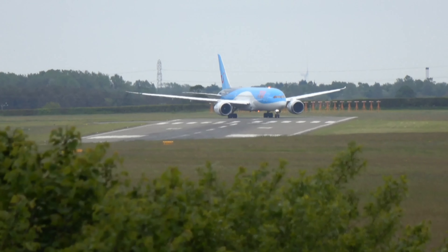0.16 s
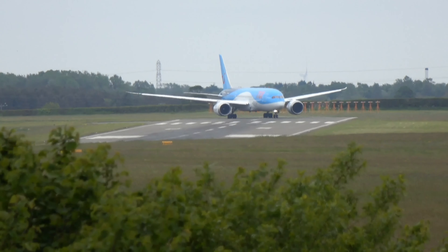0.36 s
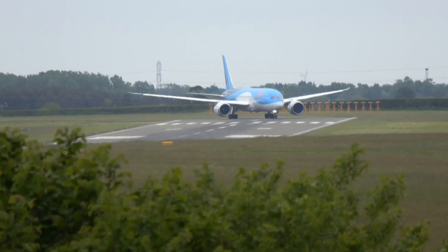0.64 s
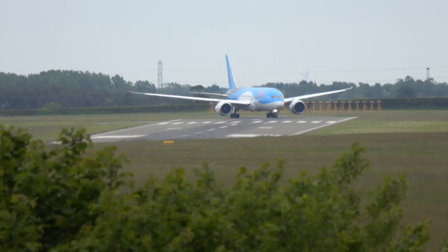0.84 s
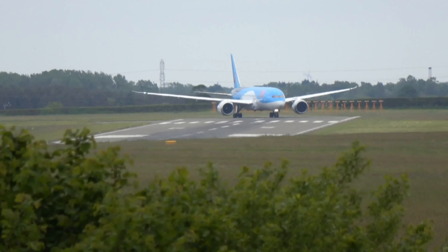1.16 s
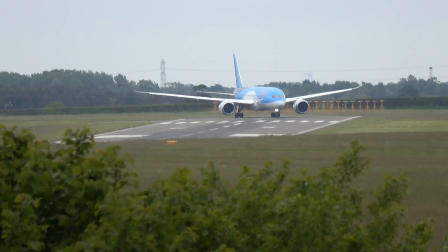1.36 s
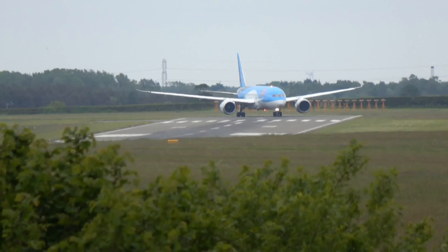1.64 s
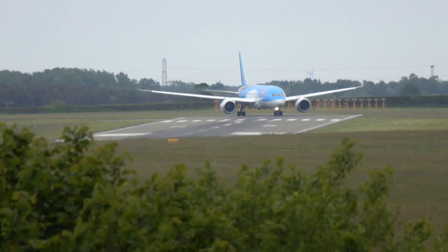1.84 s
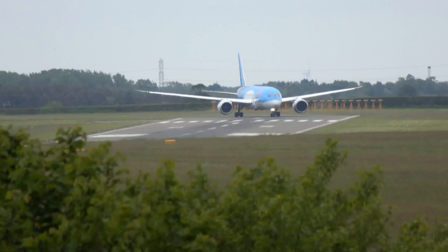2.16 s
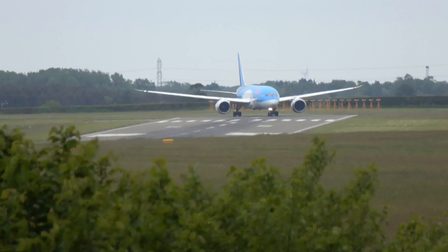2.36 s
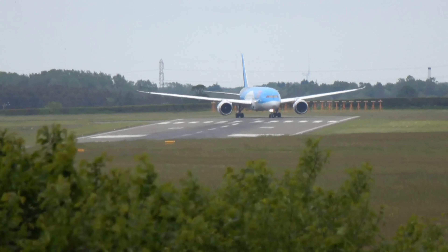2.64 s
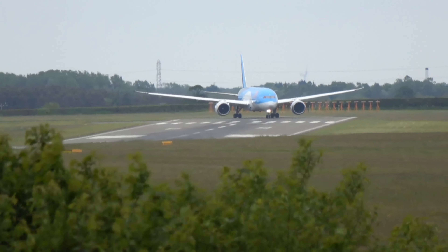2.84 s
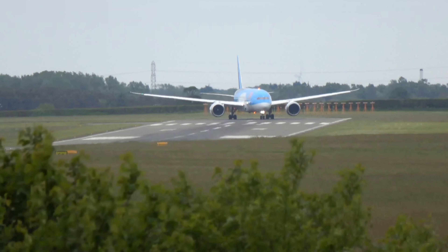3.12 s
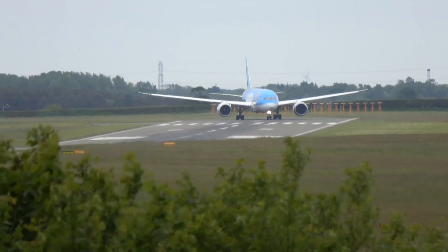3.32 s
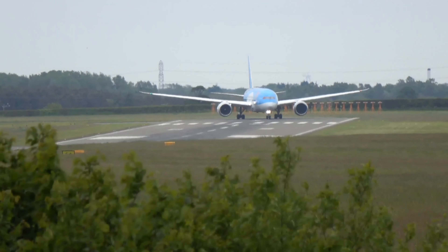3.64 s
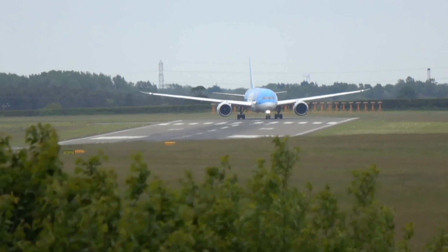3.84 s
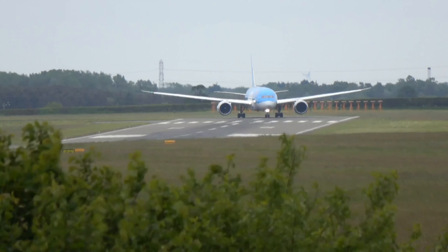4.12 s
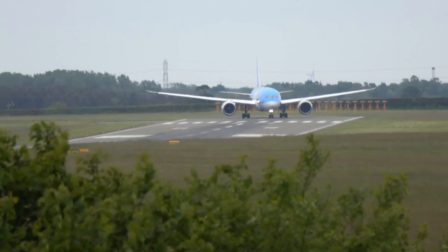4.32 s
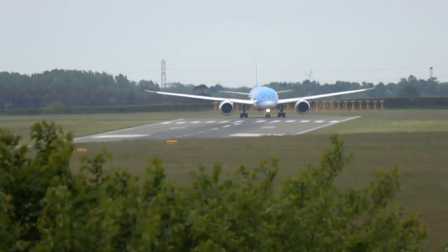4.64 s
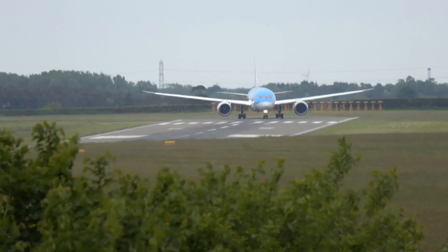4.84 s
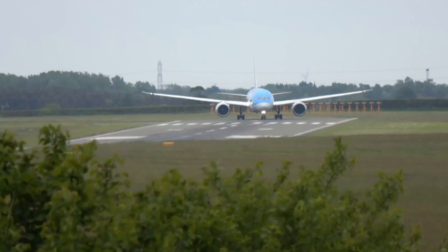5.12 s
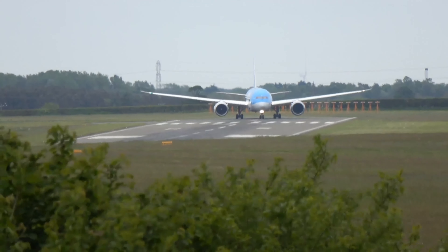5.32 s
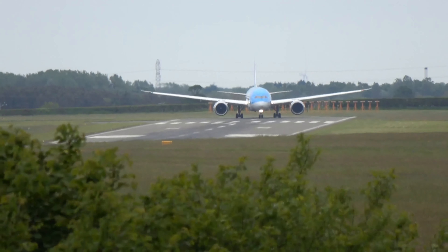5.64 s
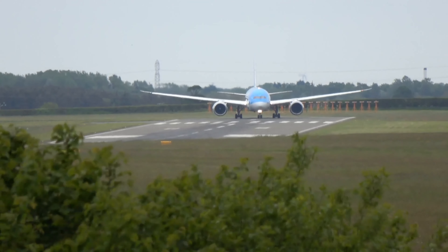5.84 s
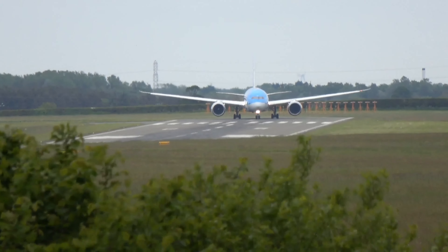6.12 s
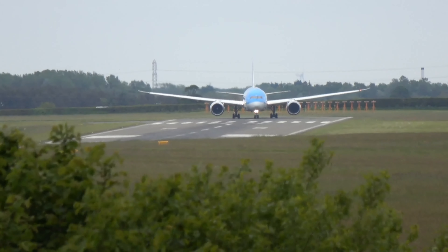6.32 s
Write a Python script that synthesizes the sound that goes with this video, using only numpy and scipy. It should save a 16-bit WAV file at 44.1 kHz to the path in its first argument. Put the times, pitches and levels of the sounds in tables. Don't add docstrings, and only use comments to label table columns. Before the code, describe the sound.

Outdoors across a grass field, a distant twin-jet airliner gives a continuous broad, soft roar at low thrust, with a breathy fan moan slowly falling in pitch. Strong gusts thud and flutter on an unprotected microphone, briefly overloading it. A near bird chirps clear gliding notes early; a farther one warbles and trills. Late on, a low propeller-engine drone joins.

```python
import sys
import numpy as np
from scipy import signal
from scipy.fft import rfft, irfft
from scipy.io import wavfile
from scipy.ndimage import uniform_filter1d

SR = 44100
rng = np.random.default_rng(int(sys.argv[2]) if len(sys.argv) > 2 else 0)


def boost_factor(decibels):
    exponent = np.asarray(decibels, float) / 20
    return 10 ** exponent


def unload_audio(sound):
    columns = np.transpose(np.atleast_2d(sound))
    steps = np.round(np.clip(columns, -1, 1) * 32767)
    wavfile.write(sys.argv[1], SR, steps.astype(np.int16))


N = 285768

# [start
# t/s, end t/s, first f/Hz, last f/Hz, level/dB]
FAR_WHISTLES = [(2.74, 2.89, 7700, 7720, -73), (2.8, 2.96, 6850, 6850, -72),
                (3.06, 3.145, 4300, 4230, -54.5), (3.29, 3.36, 5680, 5620, -63),
                (3.43, 3.67, 3850, 3820, -52.5), (3.89, 4.08, 5550, 5450, -62.5),
                (4.64, 4.69, 7200, 7180, -69), (4.925, 4.955, 7300, 7250, -68),
                (4.965, 5.1, 6030, 5850, -61), (5.65, 5.79, 6800, 6780, -69), (5.85, 6.02, 6130, 6100, -68),
                (6.05, 6.19, 6050, 6050, -66), (5.87, 5.92, 4900, 4700, -63), (6.07, 6.11, 4700, 4600, -62)]
# [start t/s, end t/s, first f/Hz, last f/Hz, level/dB]
FAR_WARBLES = [(.22, .36, 8500, 8550, -77), (.2, .36, 6850, 6950, -76), (2.435, 2.5, 5000, 4800, -60),
               (2.5, 2.57, 5050, 4850, -60), (2.575, 2.645, 5120, 4950, -59.5),
               (2.645, 2.72, 5100, 5000, -60), (3.025, 3.07, 4500, 4350, -56),
               (3.185, 3.29, 5900, 5750, -59.5), (3.32, 3.445, 5250, 5050, -58.5),
               (3.67, 3.85, 7150, 7250, -68), (4.725, 4.79, 3950, 4080, -49.5),
               (4.825, 4.89, 3950, 4060, -50.5), (4.88, 4.93, 4000, 3950, -56),
               (5.77, 5.9, 6600, 6750, -72), (6.18, 6.24, 5950, 5900, -64), (6.2, 6.24, 8650, 8650, -77),
               (6.25, 6.295, 4950, 4900, -61)]
# [start t/s, end t/s, first f/Hz, last f/Hz, level/dB]
FAR_BUZZES = [(2.73, 2.89, 7300, 7250, -70), (4.65, 4.72, 6900, 6400, -65), (4.94, 5.01, 6900, 6300, -66),
              (5.08, 5.13, 5300, 5200, -58), (5.11, 5.21, 5300, 5300, -63), (5.19, 5.28, 5450, 4950, -58),
              (5.3, 5.4, 5300, 5100, -57), (5.39, 5.51, 5300, 5200, -57.5), (5.47, 5.65, 5350, 5300, -58)]
# [start t/s, top t/s, end t/s, top f/Hz, level/dB]
NEAR_ARCHES = [
    (.385, .447, .492, 3800, -43),
    (.538, .578, .635, 3740, -44),
    (.705, .736, .77, 3770, -48),
    (1.37, 1.405, 1.407, 4000, -52),
]
# [start t/s, end t/s, first f/Hz, last f/Hz, level/dB]
NEAR_SLIDES = [(.2, .33, 4600, 3160, -45), (1.035, 1.16, 3550, 4540, -53), (1.15, 1.23, 4540, 3650, -57),
               (2.215, 2.325, 4250, 3350, -54), (2.425, 2.47, 3400, 3650, -51),
               (2.46, 2.505, 3650, 3200, -49), (2.6, 2.64, 3450, 3900, -54), (2.64, 2.69, 3800, 3300, -52),
               (2.735, 2.755, 3800, 3300, -51), (4.97, 5.005, 4850, 4700, -58), (5, 5.11, 4420, 4000, -58),
               (5.275, 5.322, 5100, 6900, -68), (5.318, 5.35, 7000, 6100, -74),
               (5.6, 5.635, 5100, 5700, -62), (5.795, 5.84, 5200, 6050, -62),
               (5.995, 6.03, 5100, 5400, -59), (6.388, 6.412, 3500, 4300, -46),
               (6.412, 6.465, 5420, 5050, -55)]
# [leap t/s, lead-in t/s, low f/Hz, level/dB]
NEAR_LEAPS = [
    (.078, .048, 3470, -43),
]
# [t/s, third order f/Hz, level/dB]
DRONE_TRACK = [(4.4, 150.2, -46), (4.7, 150.2, -38), (5, 150.2, -35), (5.6, 150.1, -34), (6.2, 150, -35),
               (6.45, 149.8, -42)]
# [multiple of the first order, level/dB]
DRONE_ORDERS = [(1, -2), (2, 1), (3, 0)]
# [f/Hz, level/dB per Hz]
BUFFET_SPECTRUM = [(1, -60), (3, -24), (9, -8), (22, 0), (30, -2), (42, -11), (55, -35), (120, -120)]
# [f/Hz, level/dB per Hz]
FLUTTER_SPECTRUM = [(15, -89), (30, -23), (46, 7.5), (70, -1), (110, -19), (200, -24), (400, -73),
                    (800, -140)]
# [middle t/s, length t/s, buffet level/dB, flutter level/dB]
GUST_EVENTS = [(0.03, 0.073, -9, -28.5), (0.154, 0.28, -6, -16.5), (.33, 0.3, -15, -21.5),
               (0.539, 0.25, -11.5, -16.5), (0.673, 0.15, -12.5, -23), (0.809, 0.12, -9.5, -23),
               (0.982, 0.29, -8, -18.5), (1.201, .16, -9.5, -25), (1.317, 0.11, -19, -37),
               (1.51, 0.22, -26, -35), (1.832, 0.44, -22, -39), (2.29, 0.17, -13, -35),
               (2.48, 0.25, -16, -32), (2.756, .14, -9.5, -25), (2.891, 0.21, -5, -25),
               (3.127, .18, -5.5, -24.5), (3.33, 0.18, -6, -22), (3.62, 0.6, -23, -34),
               (3.99, .14, -20.5, -38), (4.453, 0.13, -22, -26), (4.706, 0.3, -12.5, -34),
               (4.902, .14, -22, -36), (5.247, 0.17, -17, -28.5), (5.406, 0.16, -20, -32),
               (5.606, 0.26, -11, -26), (5.76, 0.32, -10, -18), (5.923, 0.12, -13.5, -18.5),
               (6.07, 0.4, -12, -23), (6.256, 0.093, -15.5, -32), (6.434, 0.2, -9, -20.5)]
CALM_LEVELS = -27, -33
# [t/s, f/Hz, level/dB]
FAN_TRACK = [(0, 265, -49.5), (.5, 265, -31.5), (1.4, 249.8, -35), (2.2, 235.5, -38), (3, 220.6, -35),
             (4, 208, -34.5), (4.6, 209, -44), (5.5, 209, -40), (6.48, 205.5, -58)]
# [f/Hz, level/dB per Hz]
JET_SPECTRUM = [(40, -19.5), (70, -2), (170, 0), (240, 3.5), (320, -2), (500, -16.5), (920, 0),
                (2000, -15.5), (3500, -27.5), (4300, -36), (6000, -46), (7500, -53.5), (11000, -56.5),
                (11600, -86)]
JET_BAND_CENTRES = 330, 950, 2200, 9000
# [t/s, gain level/dB]
AIR_CARRY = [(0, -1.5), (.4, -2.5), (.8, 1), (1.2, -1.5), (1.6, -2), (2.2, -1), (2.8, 0.5), (3.3, -2),
             (3.8, -1), (4.4, -1.5), (4.9, -2.5), (5.3, -0.5), (5.7, 0.5), (6.1, -1), (6.48, -1.5)]
CARRY_SHARES = .6, 1.05, .7
NOSE_ON_TIMES = 4.4, 4.58
NOSE_ON_GAINS = 3.5, 0.95, 2.5


def evened(x):
    return x / np.sqrt(np.mean(x ** 2) + 1e-20)


def read(points, hz):
    f, value = np.transpose(points)
    return np.interp(np.log(hz + 1), np.log(f + 1), value)


def columns(rows):
    s, *rest = np.transpose(rows)
    t = np.arange(s[0], s[-1], 1 / SR)
    return s[0], [np.interp(t, s, c) for c in rest]


def add(mix, s, sound):
    part = mix[round(s * SR):][:len(sound)]
    part += sound[:len(part)]


def wander(size, span_s):
    width = max(int(span_s * SR), 1)
    smooth = uniform_filter1d(rng.standard_normal(size), width)
    return evened(uniform_filter1d(smooth, width))


def coloured(points):
    hz = np.fft.rfftfreq(N, 1 / SR)
    return evened(irfft(rfft(rng.standard_normal(N)) * boost_factor(read(points, hz)), N))


def hedges(x, t60=0.45):
    t = np.arange(SR // 2) / SR
    echoes = rng.standard_normal(len(t))
    sparse = rng.random(len(t)) < .05
    taps = echoes * sparse * boost_factor(-60 * t / t60)
    return signal.fftconvolve(x, taps / np.linalg.norm(taps))[:N]


def trill(start, end, first_hz, last_hz, depth_hz, db):
    s, (hz,) = columns([(start, first_hz), (end, last_hz)])
    rate_hz = 120 * (1 + .4 * wander(len(hz), .003))
    warble = np.sin(2 * np.pi * np.cumsum(rate_hz) / SR)
    weakening_db = np.linspace(0, -4, len(hz))
    level_db = 3 * wander(len(hz), .006) + weakening_db
    tone = boost_factor(level_db) * np.sin(2 * np.pi * np.cumsum(hz + depth_hz * warble) / SR)
    return s, boost_factor(db) * evened(tone) * signal.windows.tukey(len(hz), .3)


def far_bird():
    song = np.zeros(N)
    for depth_hz, rows in ((65, FAR_WHISTLES), (165, FAR_WARBLES), (520, FAR_BUZZES)):
        for start, end, first_hz, last_hz, db in rows:
            add(song, *trill(start, end, first_hz, last_hz, depth_hz, db))
    return song


def glide(rows):
    s, (hz, db) = columns(rows)
    smooth_hz = uniform_filter1d(hz, size=300, mode="nearest")
    tone = np.sin(2 * np.pi * np.cumsum(smooth_hz) / SR)
    level = boost_factor(db + 2 * wander(len(hz), .006))
    return s, np.sqrt(2) * level * tone * signal.windows.tukey(len(hz), .15)


def arch(start, top, end, top_hz, db):
    hz_per_s, ends_db = 13500, -6
    return glide([(start, top_hz - hz_per_s * (top - start), db + ends_db),
                  (top, top_hz, db),
                  (end, top_hz - hz_per_s * (end - top), db + ends_db)])


def slide(start, end, first_hz, last_hz, db):
    bow, ends_db, db_per_khz = 1.6, -5, -4
    u = np.linspace(0, 1, 9)
    below = (u if first_hz > last_hz else 1 - u) ** bow
    hz = max(first_hz, last_hz) - abs(first_hz - last_hz) * below
    level = db + ends_db * (2 * u - 1) ** 2 + db_per_khz * (hz - hz.mean()) / 1000
    return glide(np.transpose([start + (end - start) * u, hz, level]))


def leap(at, lead, low_hz, db):
    leap_s, hold_s, lead_db = .012, .05, -4
    high_hz, high_db = low_hz * 1.365, db - 10
    return glide([(at - lead, .97 * low_hz, db + lead_db),
                  (at, low_hz, db),
                  (at + leap_s, .985 * high_hz, high_db),
                  (at + leap_s + .6 * hold_s, high_hz, high_db),
                  (at + leap_s + hold_s, .965 * high_hz, high_db + lead_db)])


def near_bird():
    song = np.zeros(N)
    for note, rows in ((arch, NEAR_ARCHES), (slide, NEAR_SLIDES), (leap, NEAR_LEAPS)):
        for row in rows:
            add(song, *note(*row))
    return song


def drone(waver_db=1.5):
    s, (hz, db) = columns(DRONE_TRACK)
    turns = np.cumsum(hz / 3) / SR
    tones = np.zeros(len(hz))
    for k, order_db in DRONE_ORDERS:
        level = boost_factor(order_db + waver_db * wander(len(hz), 0.13))
        tones += level * np.sin(2 * np.pi * (k * turns + rng.random()))
    return s, np.sqrt(2) * boost_factor(db) * tones * signal.windows.tukey(len(hz), .2)


def gusts(size):
    t = np.arange(size) / SR
    power = boost_factor(np.array(CALM_LEVELS))[:, None] ** 2 * np.ones(size)
    for middle, length, *levels_db in GUST_EVENTS:
        swell = np.cos(np.pi * np.clip((t - middle) / length, -.5, .5)) ** 2
        power = power + boost_factor(np.array(levels_db))[:, None] ** 2 * swell
    return 10 * np.log10(power)


def wind():
    db, flutter_db = gusts(N)
    slow_spectrum = [(hz / 1.4, level) for hz, level in BUFFET_SPECTRUM]
    layers = [coloured(BUFFET_SPECTRUM), coloured(FLUTTER_SPECTRUM), coloured(slow_spectrum)]
    quick, flutter, slow = (v / np.sqrt(uniform_filter1d(v ** 2, size=2000) + 0.1) for v in layers)
    share = np.interp(uniform_filter1d(flutter_db, size=4000), (-28, -23), (0, np.pi / 2))
    buffet = np.sin(share) * quick + np.cos(share) * slow
    buffet = buffet - uniform_filter1d(buffet, size=12000)
    t = np.arange(N) / SR
    edge_db = -15 * np.exp(-t / .006) - 7 * np.exp((t - t[-1]) / .006)
    return 0, boost_factor(edge_db) * (boost_factor(db) * buffet + boost_factor(flutter_db) * flutter)


def moan(width_hz=14):
    s, (hz, db) = columns(FAN_TRACK)
    turn = np.exp(2j * np.pi * np.cumsum(hz) / SR)
    r = np.exp(-np.pi * width_hz / SR)
    noise = rng.standard_normal(len(hz)) / turn
    slow = signal.lfilter([(1 - r) ** 2], [1, -2 * r, r * r], noise)
    return s, boost_factor(db) * evened((slow * turn).real)


def jets(patchy_db=0.44, swell_db=0.63):
    frames, hz = N // 256 + 5, np.fft.rfftfreq(1024, 1 / SR)
    starts = np.arange(frames) * 256
    t = starts / SR
    carry_db = np.interp(t, *np.transpose(AIR_CARRY))
    facing = np.interp(t, NOSE_ON_TIMES, (0, 1))
    changes = np.outer(CARRY_SHARES, carry_db) + np.outer(NOSE_ON_GAINS, facing - facing.mean())
    shares = np.array([read(list(zip(JET_BAND_CENTRES, row)), hz) for row in np.eye(3, 4)])
    a, b, patches = rng.standard_normal((frames, 513, 3)).T
    patches = uniform_filter1d(patches, size=8, axis=0)
    patches = evened(uniform_filter1d(patches, size=50, axis=1))
    swell = wander(N, .04)[np.minimum(starts, N - 1)]
    field_db = read(JET_SPECTRUM, hz)[:, None] + shares.T @ changes
    field_db = field_db + patchy_db * patches + swell_db * swell
    noise = signal.istft((a + 1j * b) * boost_factor(field_db), nperseg=1024, noverlap=768)[1][:N]
    return boost_factor(-25) * evened(noise)


def scene():
    mix = jets()
    for part in (moan(), drone(), wind()):
        add(mix, *part)
    near = near_bird()
    far = far_bird()
    mix += near + boost_factor(-11) * hedges(near) + far + boost_factor(-5) * hedges(far)
    return mix[None]


def top_cut(x):
    return signal.sosfilt(signal.butter(12, 11047, fs=SR, output="sos"), x)


def record(dry):
    mix = np.clip(dry, -1, 1)
    return top_cut(mix)


dry = scene()
out = record(dry)
unload_audio(out)
```